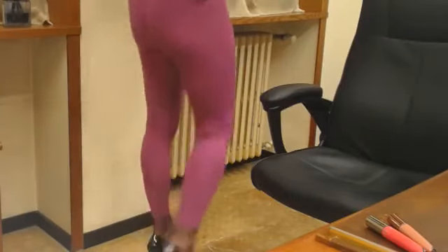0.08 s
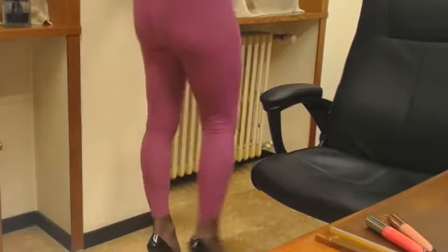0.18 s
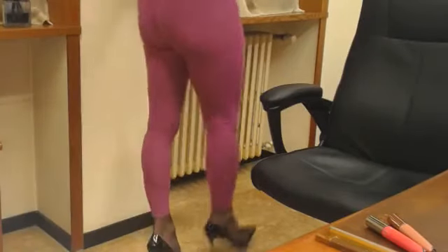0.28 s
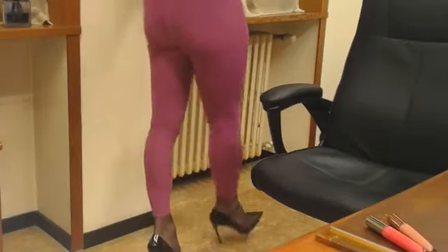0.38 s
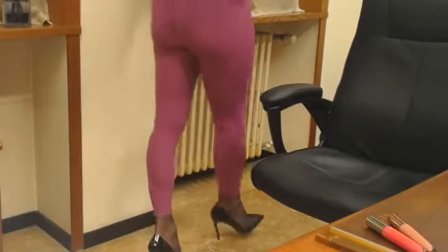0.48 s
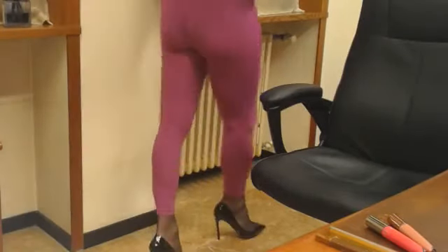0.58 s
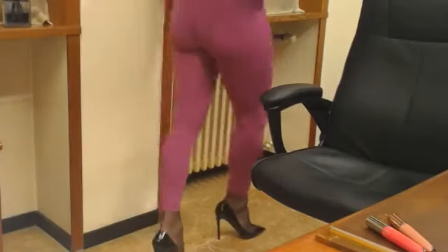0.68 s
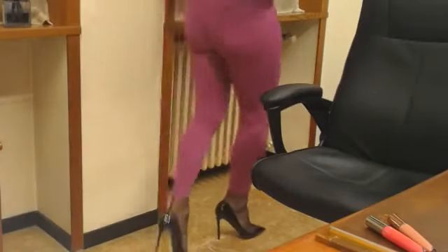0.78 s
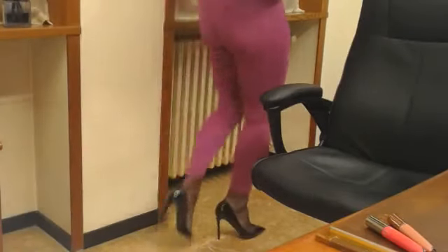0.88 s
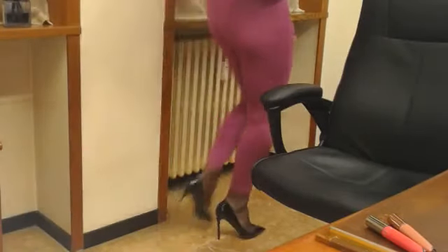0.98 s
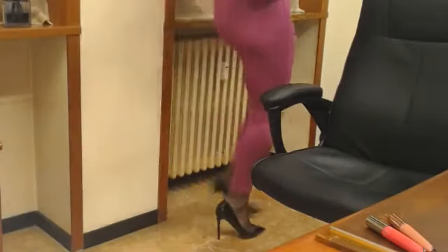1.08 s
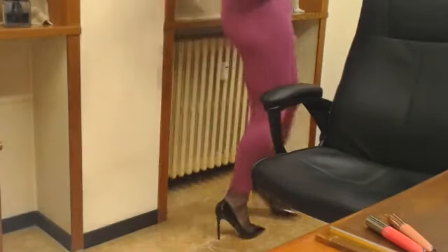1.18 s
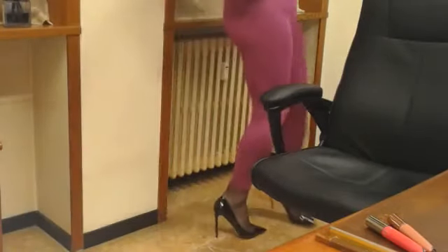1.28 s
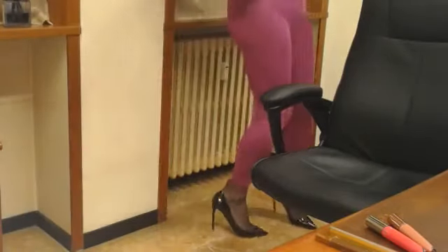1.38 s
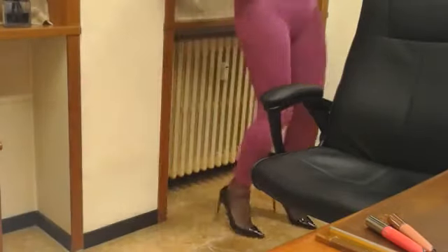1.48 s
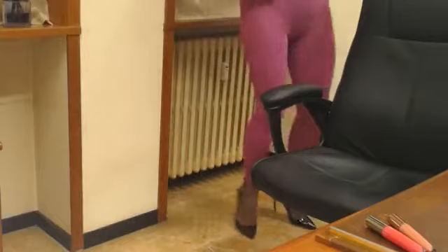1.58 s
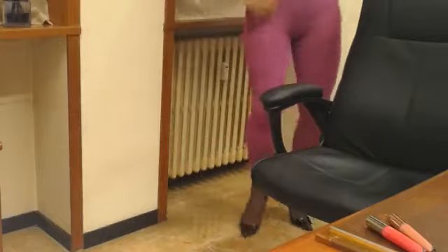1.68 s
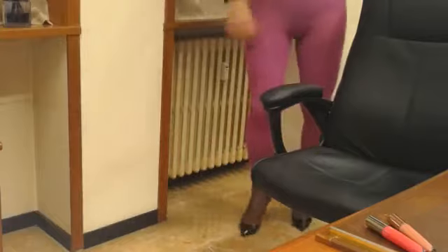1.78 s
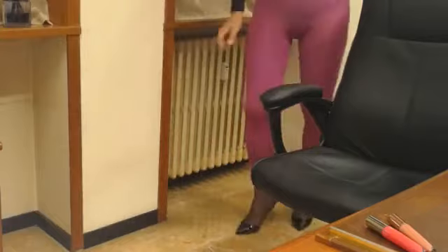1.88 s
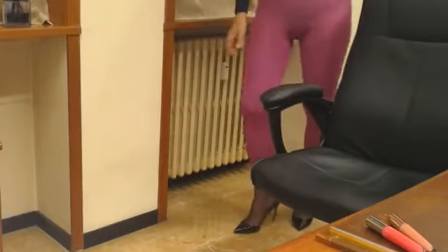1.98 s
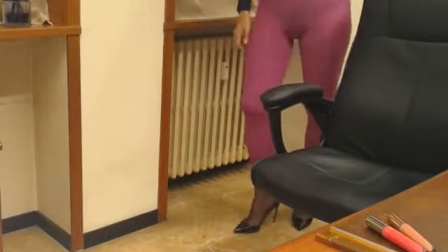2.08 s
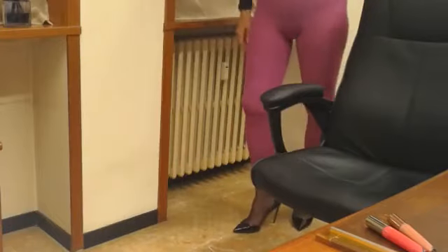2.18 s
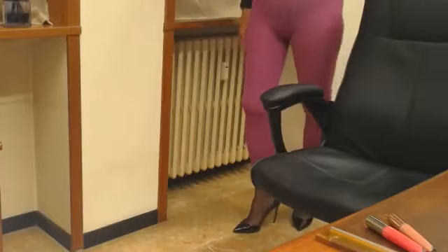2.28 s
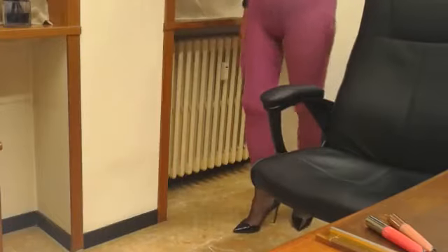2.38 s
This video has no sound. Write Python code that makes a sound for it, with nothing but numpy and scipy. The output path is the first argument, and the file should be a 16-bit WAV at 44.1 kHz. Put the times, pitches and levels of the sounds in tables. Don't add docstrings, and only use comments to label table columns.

```python
import sys
import numpy as np
from scipy import signal
from scipy.fft import rfft, irfft
from scipy.io import wavfile
from scipy.ndimage import uniform_filter1d

SR = 44100
rng = np.random.default_rng(int(sys.argv[2]) if len(sys.argv) > 2 else 0)


def transcribe(signal):
    frames = np.atleast_2d(signal).T
    limited = np.clip(frames, -1, 1)
    pcm = np.round(limited * 32767).astype(np.int16)
    wavfile.write(sys.argv[1], SR, pcm)


def voltage_ratio(level):
    return 10 ** (np.asarray(level, float) / 20)


N = 105840
PAD = 2376


def rms_one(x):
    return x / np.sqrt(np.mean(x ** 2) + 1e-20)


def at_hz(points, hz):
    table_hz, value = np.transpose(points)
    return np.interp(np.log(hz), np.log(table_hz), value)


def drift(rate_hz):
    r = np.exp(-80 * np.pi * rate_hz / SR)
    white = rng.standard_normal(N // 40 + 2002)
    slow = signal.lfilter([1], [1, -2 * r, r * r], white)[2000:]
    return np.interp(np.arange(N) / 40, np.arange(len(slow)), rms_one(slow))


def resonate(x, hz, width_hz):
    r = np.exp(-np.pi * width_hz / SR)
    poles = [1, -2 * r * np.cos(2 * np.pi * hz / SR), r * r]
    return signal.lfilter([(1 - r * r) / 2, 0, (r * r - 1) / 2], poles, x)


def resonate_twice(x, hz, width_hz):
    return resonate(resonate(x, hz, width_hz), hz, width_hz)


def band_pass(x, order, edges_hz):
    return signal.sosfilt(signal.butter(order, edges_hz, "band", fs=SR, output="sos"), x)


def padded(x):
    size = x.shape[-1] + 2 * PAD
    mirrored = np.pad(x, [(0, 0), (PAD, PAD)], "reflect")
    return rfft(mirrored), np.arange(size // 2 + 1) * SR / size + 1e-9


def cropped(spectrum):
    return irfft(spectrum)[..., PAD:-PAD]


# f/Hz, likeness/0-1
LIKENESS = [(60, 1), (500, 0.93), (1000, 0.75), (2000, 0.2), (4000, 0.04), (8000, 0.5), (12000, 0)]
LEFT_LAG_S, LEFT_DB = .0001, -0.58


def two_ports(mid_side):
    (mid, side), hz = padded(mid_side)
    alike = np.clip(at_hz(LIKENESS, hz), 0, 1)
    mid, side = mid * np.sqrt(1 + alike), side * np.sqrt(1 - alike)
    left = (mid + side) * np.exp(-2j * np.pi * hz * LEFT_LAG_S)
    return cropped(np.array([left, mid - side])) / np.sqrt(2)


# f/Hz, level/dB per Hz
AIR_COLOUR = [(20, -21.5), (28, -15), (60, -5), (110, -5.5), (160, -7.5), (300, -3.5), (400, -11.5),
              (900, -17),
              (1400, -20.5), (2200, -29), (4000, -35.5), (7000, -45), (9000, -42.5), (11000, -54),
            (14000, -55.5), (16000, -45)]
AIR_DB = -47.5
TREBLE_PATCHY_DB, TREBLE_FROM_HZ = 1.5, 2500


def air(patchy_db):
    out, together = 0, drift(2.5)
    edges = 20 * 2 ** np.arange(0, 10, .5)
    white = rng.standard_normal((2, 2, N))
    for k, (low, high) in enumerate(zip(edges, edges[1:])):
        band = band_pass(white[k % 2], 2, [low, high])
        level_db = at_hz(AIR_COLOUR, np.sqrt(low * high))
        level_db = level_db + patchy_db * (0.34 * together + drift(26))
        if low > TREBLE_FROM_HZ:
            level_db = level_db + TREBLE_PATCHY_DB * drift(4.8)
        out = out + band * voltage_ratio(level_db)
    return two_ports(voltage_ratio(AIR_DB) * out / np.sqrt(np.mean(out[0] ** 2)))


# f/Hz, width/Hz, level/dB
HUM = [(33.05, 13, -51.5), (130.8, 18, -56), (291, 34, -56), (865.5, 110, -61.5)]
# t/s, level/dB
RUMBLE = [
    (0, -5),
    (.13, -10),
    (.3, 5),
    (.7, -1),
    (1.08, 2),
    (1.25, -5),
    (1.65, 2.5),
    (2.1, -5.5),
    (2.4, -12),
]


def hums():
    out = 0
    rumble_db = np.interp(np.arange(N) / SR, *np.transpose(RUMBLE))
    for hz, width_hz, db in HUM:
        tone = rms_one(resonate_twice(rng.standard_normal((2, N)), hz, width_hz))
        out = out + voltage_ratio(db + (hz < 50) * rumble_db) * tone
    return two_ports(out)


# start t/s, length/s, level/dB, centre f/Hz, width/octaves
SCUFFS = [(-.05, .11, -47.5, 4000, 1.33), (0.226, 0.033, -45.5, 3720, 1.11),
          (0.652, 0.12, -57.5, 4500, 1.8), (0.813, 0.13, -64, 4000, 1.7), (1.36, 0.12, -45.5, 2140, 1.14),
          (1.366, 0.18, -61.5, 5060, 1.2), (1.423, 0.022, -49, 2950, 0.26), (1.464, 0.49, -61, 4680, 1.67),
          (1.618, 0.71, -60, 3250, 1.78), (1.913, 0.36, -68.5, 7700, 0.78), (0.261, 0.16, -59, 4240, 1.4),
          (0.659, 0.12, -51, 2410, 1.25), (1.264, 0.95, -74.5, 10000, 0.7)]
SCUFF_GRAINS_PER_S, SCUFF_ATTACK_SHARE = 7000, 0.11


def scuffs():
    out, t = 0, np.arange(N) / SR
    for s, length, db, hz, octaves in SCUFFS:
        grit = (rng.random((2, N)) < SCUFF_GRAINS_PER_S / SR) * rng.standard_normal((2, N))
        part = (t - s) / length
        attack, fade = part / SCUFF_ATTACK_SHARE, (1 - part) / (1 - SCUFF_ATTACK_SHARE)
        swell = np.clip(np.minimum(attack, fade), 0, 1)
        edges = np.clip(hz * 2 ** (octaves * np.array([-.5, .5])), 50, .45 * SR)
        out = out + voltage_ratio(db) * swell * rms_one(band_pass(grit, 3, edges))
    return two_ports(out)


# f/Hz, level/dB, t60/s
ROOM_MODES = [(136, -4, 0.33), (191.7, 12.5, 0.64), (303.7, -11, 0.87), (369, 12, 0.37),
              (397.2, 15.5, 0.58), (491.7, -4.5, 13), (535, -58, 0.12), (646, 0, 0.07), (664, 14, 0.47),
              (795, -20, 0.3), (986, 4, 0.5), (1100, -40.5, 0.37)]
MODES_DB, MODE_SCATTER_DB = -31.5, 1.5
TAIL_DB, TAIL_T60_S, TAIL_RISE_S = -22.5, 0.34, 0.0045
EARLY_DB, EARLY_S = 2.5, 0.0083
ECHOES_PER_S, ECHO_GROWTH_PER_S2, SCATTER_HZ = 300, 9000, 280


def room_response(t, hz):
    noise, luck = rng.standard_normal((2, len(t))), rng.standard_normal((len(ROOM_MODES), 2))
    rise = 1 - np.exp(-t / TAIL_RISE_S)
    density = (ECHOES_PER_S + ECHO_GROWTH_PER_S2 * t) / SR
    share = np.minimum(density * (1 + (hz / SCATTER_HZ) ** 2), 1)
    echoes = noise * (rng.random(len(t)) < share) / np.sqrt(share)
    tail_db = TAIL_DB + EARLY_DB * np.exp(-(t / EARLY_S) ** 2) - 60 * t / TAIL_T60_S
    room = voltage_ratio(tail_db) * rise * echoes
    for (mode_hz, mode_db, t60), (a, b) in zip(ROOM_MODES, luck):
        level_db = MODES_DB + 0.55 * mode_db + MODE_SCATTER_DB * a - 60 * t / t60
        room[0] += voltage_ratio(level_db) * rise * np.sin(2 * np.pi * mode_hz * t + 3 * b) / 10
    room[0, 0] = 1
    return room


# t/s, level/dB, f/Hz, ring/cycles,
# tail held/s
KNOCKS = [(.239, -25, 1210, 2.6, 0.017), (0.239, -22, 2420, 1.22, 0.012), (.243, -23.5, 713, 1.9, 0.0039),
          (0.2784, -13.5, 531, 1.01, 0.09), (.281, -33.5, 2330, 1.4, 0.15), (.293, -15.5, 220, 1.16, 0.11),
          (0.298, -34, 94, 1.73, 0.16), (.313, -25, 770, 2.3, 0.091), (.546, -25, 475, 3.95, 0.099),
          (0.549, -33, 1100, 1.3, 0.0065), (0.547, -38.5, 2080, 0.89, 0.085), (.558, -27, 604, 4.2, 0.061),
          (0.573, -35, 101.2, 1.6, 0.053), (.649, -26, 576, 1.54, 0.062), (.669, -30, 843, 2.1, 0.055),
          (.869, -51, 920, 2.2, 0.053), (1.424, -23.5, 494, 2.34, 0.011), (1.424, -31.5, 1380, 1.57, 0.04),
          (1.932, -20.5, 633, 1.96, 0.08), (1.932, -36.5, 1550, 2.2, 0.024), (2.157, -31, 910, 3.4, 0.044),
          (2.161, -39.5, 1770, 2.2, 0.03), (2.161, -39, 478, 3.2, 0.023), (2.185, -44.5, 184, 2.9, 0.011),
          (0.001, -44, 49, 1.3, .03), (.33, -49.5, 41, 1.6, .06), (.55, -24, 256, 1.9, .1),
           (0.549, -48, 6040, 1.8, 0.074), (0.548, -42.5, 43, 2.3, .05), (0.662, -45, 250, 1.9, 0.099),
           (.672, -70, 6000, 0.99, .03), (1.366, -46, 1990, 6.8, .02), (1.367, -32.5, 1010, 0.99, 0.037),
           (1.873, -49, 390, 1.5, 0.055), (2.03, -35, 577, 0.77, 0.076), (2.149, -48, 7800, 2.5, .02),
           (.2825, -22.5, 444, 1.1, 0.039), (0.312, -26, 296, 0.77, 0.0098), (.364, -27.5, 293, 0.66, 0.01),
           (.418, -32.5, 305, 1.4, 0.018), (1.945, -30, 640, 1.7, 0.075), (.649, -39.5, 1910, 3.8, 0.0067),
           (1.452, -26, 525, 1.6, 0.054)]
SOFT_CUT = 1.8
CONTACT_CYCLES = 0.71
GATE_DB_PER_S = 497


def knocks():
    size = 2 ** 14 - 2 * PAD
    out, t = np.zeros((2, N + size)), np.arange(size) / SR
    for s, db, hz, cycles, held in KNOCKS:
        low_pass = signal.butter(2, SOFT_CUT * hz, fs=SR, output="sos")
        soft = signal.sosfilt(low_pass, room_response(t, hz))
        body = resonate_twice(soft, hz, hz / cycles) * SR * cycles / hz / 2
        swell = 1 - np.exp(-(t * hz / CONTACT_CYCLES) ** 2)
        gate_db = -GATE_DB_PER_S * np.maximum(t - held, 0)
        start = int(s * SR)
        out[:, start:start + size] += body * swell * voltage_ratio(db + gate_db)
    return two_ports(out[:, :N])


# peak t/s, peak level/dB, f/Hz, length/cycles
REBOUNDS = [(0.23, -40, 3900, 6.7), (0.2416, -32, 2450, 5.2), (.241, -26, 1250, 6.3),
            (.245, -19, 620, 1.47), (0.2486, -33, 2450, 4.4), (.253, -30, 560, 2.1),
            (.2803, -31, 690, 0.57), (0.2833, -16, 553, 0.62), (.291, -37, 790, 1.5), (.322, -28, 680, 1.9),
            (.2962, -12.5, 250, 1.7), (0.3161, -13, 378, 1.45), (0.335, -19, 331, 1.3),
            (.365, -19.5, 327, 1.4), (.42, -28, 300, 3.5), (.55, -16.5, 440, 1.9), (.554, -32.5, 1150, 2.8),
            (.557, -27, 210, 0.99), (.56, -29.5, 500, 2.4), (.565, -20, 635, 2.5), (.575, -20, 460, 2.2),
            (.583, -22, 648, 2.5), (0.597, -32, 397, 1.6), (.603, -28.5, 520, 1), (.632, -27, 480, 3.7),
            (.666, -29.5, 800, 5.2), (.676, -29, 950, 5.1), (1.436, -42, 3050, 6.9),
            (1.369, -37, 2090, 4.5), (1.379, -37, 2050, 5.0), (1.394, -41, 2600, 4.0),
            (1.414, -44, 1300, 2.2), (1.4278, -20, 482, 2.6), (1.433, -19.5, 520, 0.97),
            (1.44, -20, 520, 3.55), (1.4549, -25, 500, 2.8), (1.455, -38, 1550, 3.0), (1.47, -27, 480, 4.9),
            (1.49, -29.5, 520, 3.7), (1.9335, -32.5, 830, 4.2), (1.9362, -16, 520, 1.06),
            (1.94, -34, 580, 1.7), (1.936, -37, 1550, 3.3), (1.946, -24, 650, 1.5),
            (1.955, -26.5, 387, 1.7), (1.963, -38, 700, 0.8), (1.983, -27, 600, 1.8),
            (1.992, -29.5, 395, 1.05), (2.003, -30.5, 720, 5.3)]
REBOUND_SIDE_DB = -0.5


def rebounds():
    out = np.zeros((2, N))
    sides = voltage_ratio(REBOUND_SIDE_DB) * rng.standard_normal(len(REBOUNDS))
    for (s, db, hz, cycles), side in zip(REBOUNDS, sides):
        at = np.arange(int(s * SR) - 1500, int(s * SR) + 1500)
        turns = (at / SR - s) * hz
        swell = np.exp(-(turns / cycles * 1.4) ** 2)
        out[:, at] += voltage_ratio(db) * swell * np.cos(2 * np.pi * turns) * [[1], [side]]
    return two_ports(out) * np.sqrt(2) / 1.4


def scene():
    mix = air(patchy_db=1.77) + hums() + scuffs() + knocks() + rebounds()
    return mix * voltage_ratio([[LEFT_DB], [0]])


HOLE_SHARE, HOLES_FROM_HZ = .12, 2600


def holes(x):
    hz, _, frames = signal.stft(x, SR, nperseg=1024)
    luck = uniform_filter1d(rng.standard_normal((130, frames.shape[-1])), 8, axis=1)
    luck = luck.repeat(4, axis=0)[:len(hz)]
    silent = (luck < np.quantile(luck, HOLE_SHARE)) & (hz[:, None] > HOLES_FROM_HZ)
    return signal.istft(frames * ~silent, SR, nperseg=1024)[1][:, :N]


def lose(spectrum, hz, edges, rows):
    t = np.arange(N) / SR
    lost = sum(np.clip(np.minimum(t - s, s + length - t) / .01, 0, 1) for s, length in rows)
    return np.minimum(lost, 1) * cropped(spectrum * ((hz > edges[0]) & (hz < edges[1])))


# start t/s, length/s
TREBLE_LOST = [(0.15, 0.04), (0.78, 0.041), (0.903, 0.055), (0.993, 0.056), (1.125, 0.045), (1.331, .21),
               (1.579, 0.081), (1.713, 0.029), (1.81, 0.029), (2.302, 0.096)]
# start t/s, length/s
UPPER_SEAM_LOST = [(.17, 0.085), (0.265, 0.056), (0.376, .12), (0.564, 0.044), (.77, .05), (1.173, 0.32),
                   (1.62, .22), (1.937, 0.07), (2.06, .07)]
# start t/s, length/s
TOP_LOST = [(.79, .05), (.9, .045), (1.0, .06), (1.33, .18), (1.55, .1), (1.72, .16), (2.24, .2)]
TREBLE_HZ, UPPER_SEAM_HZ, TOP_HZ = (7500, 9750), (9750, 10250), (14600, 15700)


def lost_bands(spectrum, hz):
    lost = lose(spectrum, hz, TREBLE_HZ, TREBLE_LOST)
    lost = lost + lose(spectrum, hz, UPPER_SEAM_HZ, UPPER_SEAM_LOST)
    return lost + lose(spectrum, hz, TOP_HZ, TOP_LOST)


SEAM_HZ, SEAM_WIDTH_HZ, TOP_LIFT_DB = 7800, 300, 6.5


def roll_off(x):
    return signal.sosfilt(signal.butter(12, 15610, fs=SR, output="sos"), x)


def record(dry):
    spectrum, hz = padded(holes(dry))
    spectrum = spectrum * voltage_ratio(TOP_LIFT_DB * (hz > TOP_HZ[0])) * (hz < TOP_HZ[1])
    spectrum = spectrum * (1 - 1.1 * np.exp(-((hz - SEAM_HZ) / SEAM_WIDTH_HZ * 2) ** 4))
    mix = cropped(spectrum) - lost_bands(spectrum, hz)
    return roll_off(mix)


dry = scene()
out = record(dry)
transcribe(out)
```